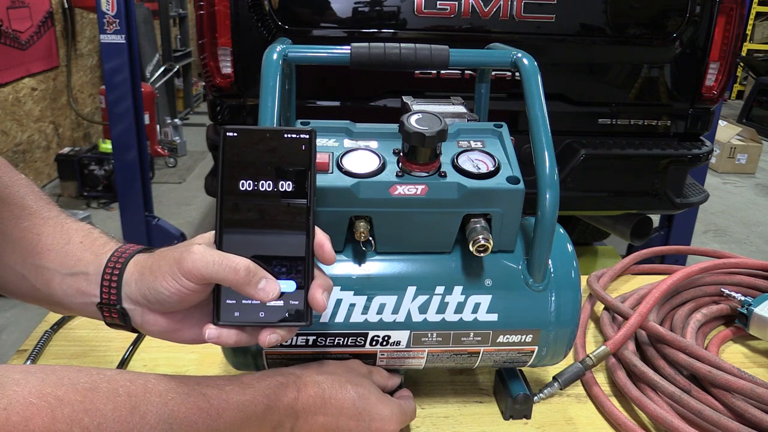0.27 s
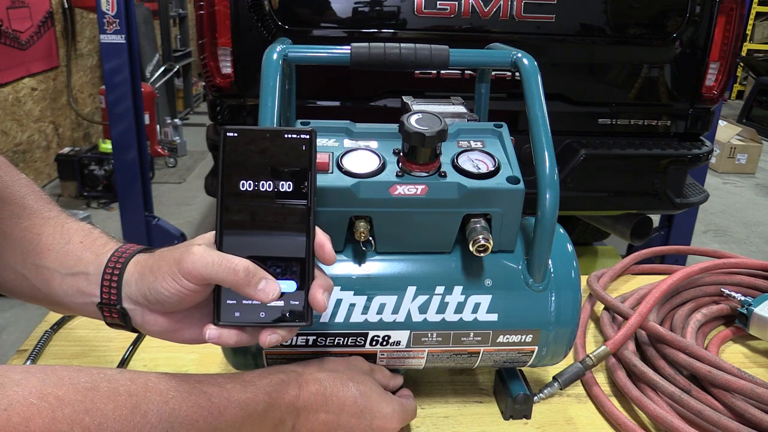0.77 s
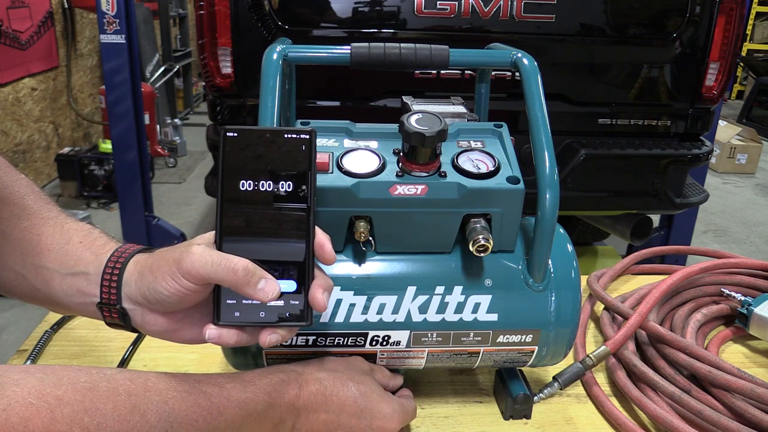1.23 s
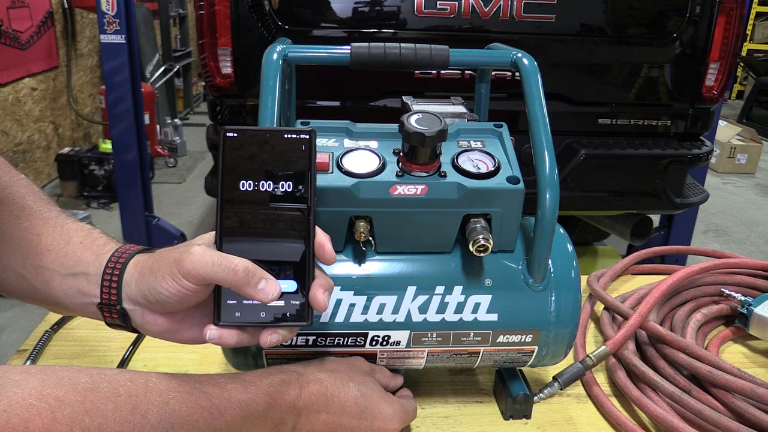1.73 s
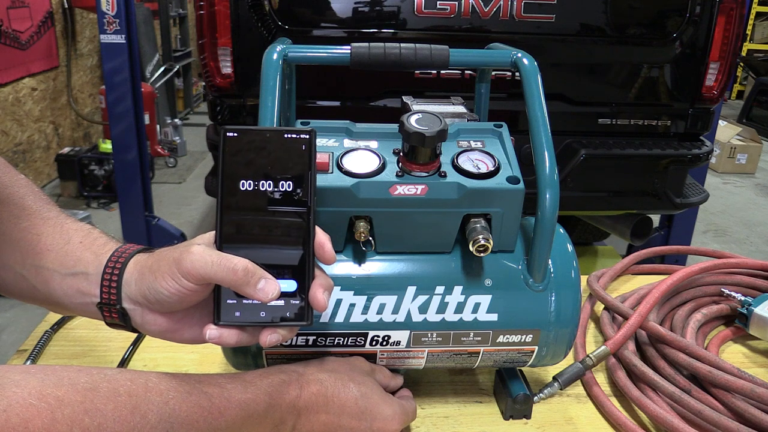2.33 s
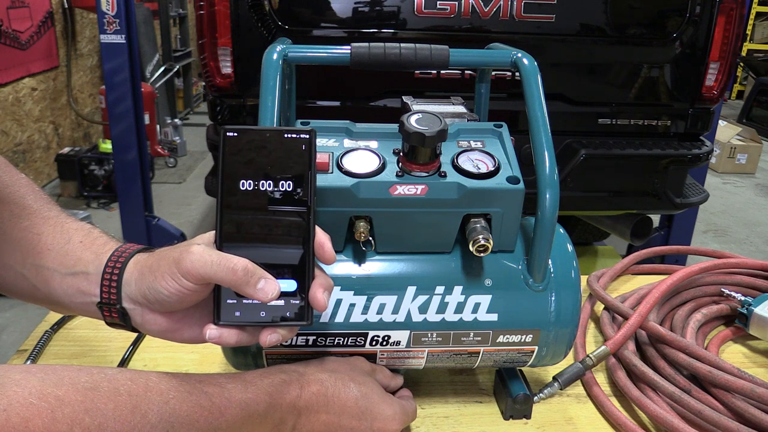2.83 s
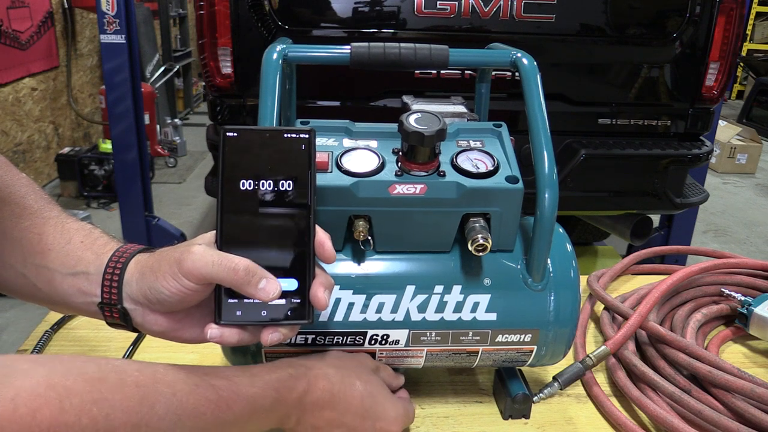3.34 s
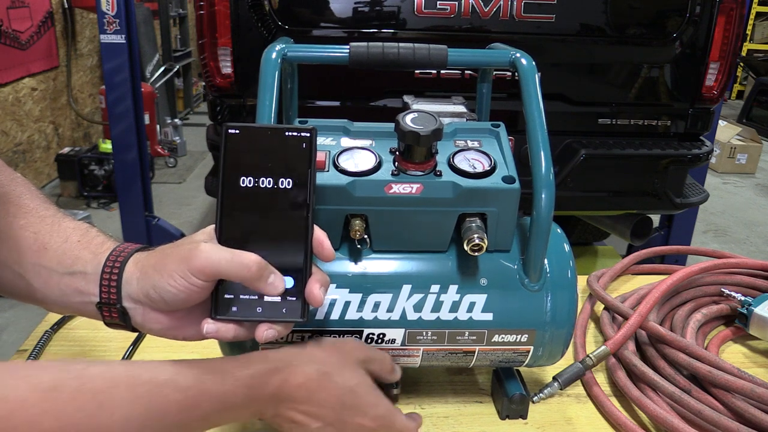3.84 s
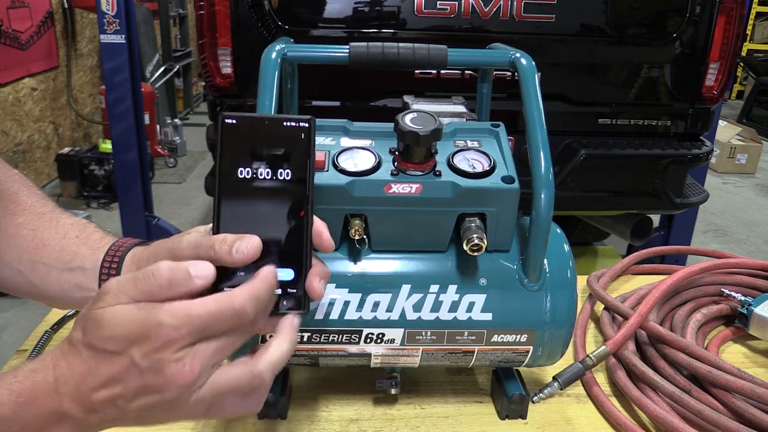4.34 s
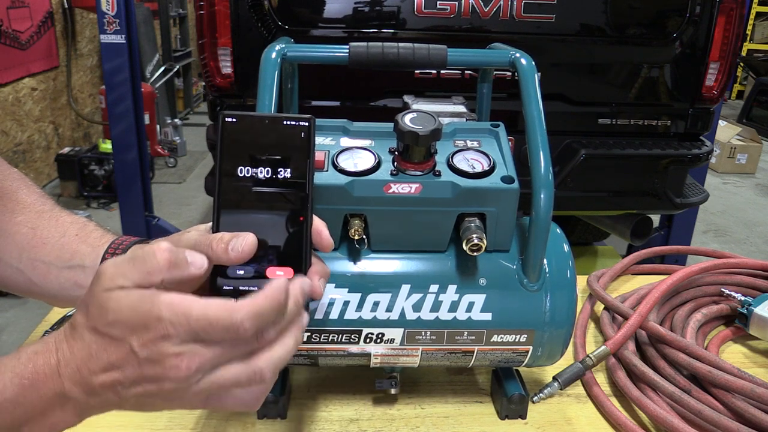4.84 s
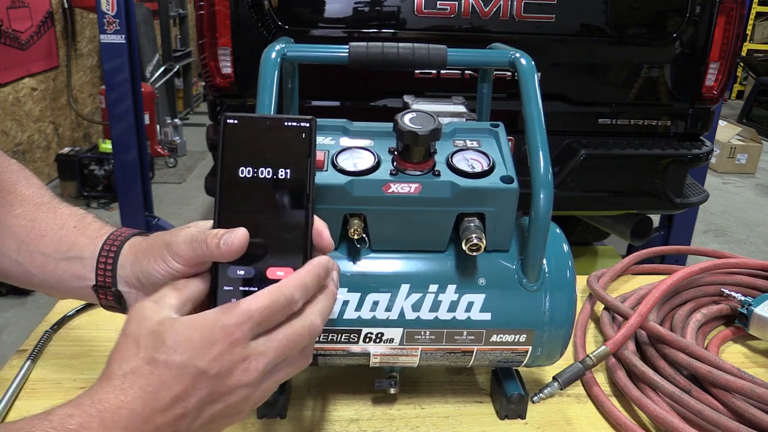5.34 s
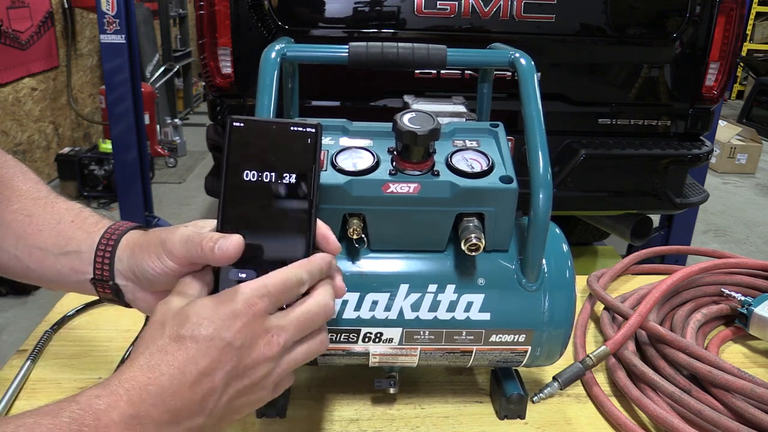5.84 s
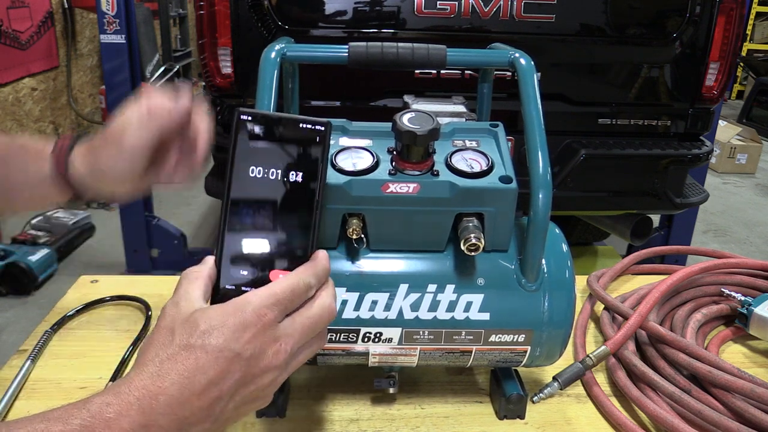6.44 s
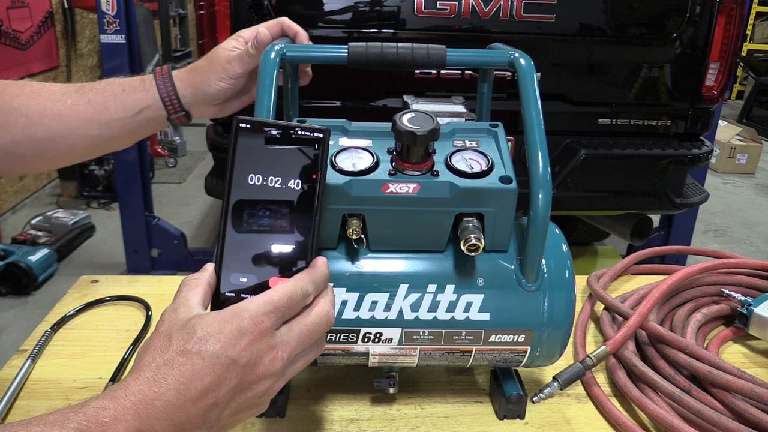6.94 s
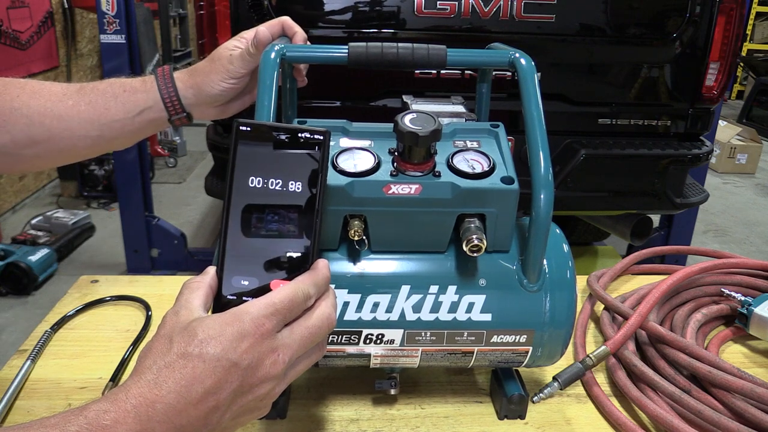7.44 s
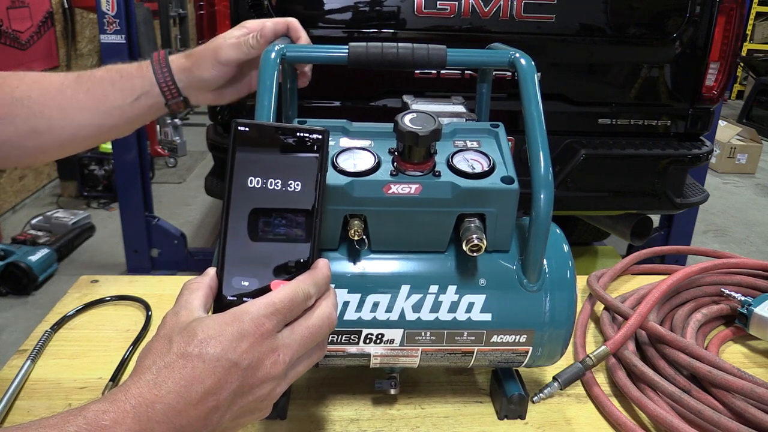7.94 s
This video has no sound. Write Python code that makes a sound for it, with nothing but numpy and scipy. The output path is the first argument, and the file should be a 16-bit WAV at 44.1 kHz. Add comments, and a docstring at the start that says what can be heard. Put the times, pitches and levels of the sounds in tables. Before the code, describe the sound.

Close to the microphone in a garage, a loud, high jet of air hisses from a compressor tank's drain valve while fingers click a few times on its handle. After about three seconds the pump starts with several dull knocks and the hiss snaps off. The small compressor then chugs on steadily, with a fast thumping throb, a motor whine, clacking valves and faint high chirps.

```python
"""Draining a compressor in a garage

Close to one microphone, a jet of air hisses from a small tank's drain valve while fingers click on the
handle. The pressure falls, the piston pump knocks on its mounts and starts, and the valve is shut.
The pump chugs on, housing thumping and reed valves chirping, and slows as the tank fills.
Late on, a hand takes hold of the carrying frame and changes how the housing shakes."""
import sys
import numpy as np
from scipy import signal
from scipy.fft import rfft, irfft
from scipy.io import wavfile
from scipy.ndimage import uniform_filter1d, map_coordinates

SR = 44100
rng = np.random.default_rng(int(sys.argv[2]) if len(sys.argv) > 2 else 0)


def generate_wav(sig):
    """Save sig (samples, or channels by samples) to the path in sys.argv[1] as 16-bit PCM at SR."""
    pcm = np.round(np.clip(np.atleast_2d(sig).T, -1, 1) * 32767).astype(np.int16)
    wavfile.write(sys.argv[1], SR, pcm)


N = 361619
T, HZ = np.arange(N) / SR, np.fft.rfftfreq(N, 1 / SR)


def gain_of(db):
    """Decibels to amplitude."""
    return 10 ** (np.asarray(db) / 20)

def unit_rms(x):
    """Scales to rms 1."""
    return x / np.sqrt(np.mean(x ** 2) + 1e-20)

def curve(rows):
    """A control curve at every sample."""
    return np.interp(T, *np.transpose(rows))

def read(points, hz=HZ):
    """A table joined by straight lines over log frequency."""
    f, value = np.transpose(points)
    return np.interp(np.log(hz + 1), np.log(f + 1), value)

def bump(hz, centre, width):
    """A bell-shaped resonance, half power at half the width."""
    return np.exp(-2 * np.log(2) * ((hz - centre) / width) ** 2)

def resonance_power(hz, modes):
    """The summed power of a body's resonances."""
    return sum((gain_of(db) * bump(hz, centre, width)) ** 2 for centre, width, db in modes)

def noise(gain, size=N):
    """Noise of rms 1 with the given spectrum."""
    return unit_rms(irfft(rfft(rng.standard_normal(size)) * gain, size))

def drift(rate):
    """A smooth random wander of rms 1."""
    coarse = T[::128]
    slow = map_coordinates(rng.standard_normal(2048), [coarse * rate], order=3, mode="wrap")
    return np.interp(T, coarse, unit_rms(slow))

def near_echoes(depth_db, spread_s):
    """Echoes from the bench and tank comb a spectrum with fine ripples."""
    delays, signs = rng.uniform(.1, 1, 14) * spread_s, rng.choice([-1, 1], 14)
    return gain_of(depth_db * unit_rms(signs @ np.cos(2 * np.pi * delays[:, None] * HZ)))

def damped_ring(hz, width, t60, size=8192):
    """A narrow band of noise dying away; low rings take longer to swell."""
    t, f = T[:size], np.fft.rfftfreq(size, 1 / SR)
    fade = gain_of(-60 * t / t60) * np.minimum(t * hz, 1)
    return unit_rms(noise(bump(f, hz, width), size) * fade) * np.sqrt(np.mean(fade ** 2))

def blow_phases(hz, ring_s, direct):
    """Phases of a body struck once a turn: the blow itself, then its scattered ring."""
    t = np.arange(1300) / SR
    ring = rng.standard_normal(len(t)) * np.exp(-t / ring_s)
    return np.angle(direct + np.exp(-2j * np.pi * np.outer(hz, t)) @ ring / np.linalg.norm(ring))

def each_turn(turns, at, length):
    """A smooth gate that opens once in every turn of the crank."""
    return np.exp(-.5 * (((turns - at + .5) % 1 - .5) / length) ** 2)

def whistle(hz, width):
    """A rough whistle of rms 1 whose pitch flutters over the given width."""
    flutter = unit_rms(uniform_filter1d(rng.standard_normal(N), int(SR / width) + 1))
    return np.sqrt(2) * np.cos(2 * np.pi * np.cumsum(hz + .5 * width * flutter) / SR)

def add(mix, s, sound):
    """Mixes a sound in at the given time."""
    mix[round(s * SR):][:len(sound)] += sound


# the garage's background (frequency [Hz], relative level [dB])
ROOM_TONE = [(12, -4.5), (33, 0), (48, -3), (62, -2.5), (85, -10), (200, -16.5), (800, -19.5), (3000, -27),
             (15000, -46)]

def room_tone(level_db=-52):
    """A low, steady rumble all around the microphone."""
    return gain_of(level_db) * noise(gain_of(read(ROOM_TONE)))


# the jet with the valve only cracked open (frequency [Hz], relative level [dB])
LEAK = [(100, -41), (900, -16), (1700, -10), (2900, -20), (4100, -7), (4700, -14), (6100, -12), (7700, -1),
        (9300, -2), (9900, -16), (11000, 0.5), (13000, -16), (15800, -16)]
# the full jet's broad rush (frequency [Hz], relative level [dB])
JET_RUSH = [(100, -46), (350, -27.5), (800, -20), (1350, -26), (2600, -21.5), (5900, -18), (7000, -10),
            (9000, -14), (11500, -8.5), (12900, -17), (15800, -22)]
# resonances of the valve bore (frequency [Hz], width [Hz], relative level [dB])
BORE_MODES = [(1960, 310, -19.5), (3490, 560, -10.5), (3946, 350, -8.5), (4660, 380, -9.5),
              (5210, 200, -12), (7370, 330, -4.5), (8030, 260, -3.5), (8230, 230, -1.5), (8530, 146, 0.5),
              (9180, 500, -6.5), (9810, 230, 0.5), (10430, 270, -1.5), (11010, 270, -2), (12200, 300, -17),
              (13620, 450, -0.5), (14560, 400, -6.5), (15000, 250, -9), (15600, 250, -11)]

def drain_hiss(open_s=0.089, shut_s=3.372, leak_db=-29.5, jet_db=-23.5, sag_db_per_s=.12):
    """Close by, a turbulent jet rings the valve bore: cracked open, then wide, then snapped shut."""
    power = gain_of(read(JET_RUSH)) ** 2 + resonance_power(HZ, BORE_MODES)
    surge_db = np.exp(-abs(T - open_s) / .2)
    throttle_db = -2.5 * np.exp(-abs(T - shut_s) / 0.045)
    flow_db = jet_db - sag_db_per_s * T + surge_db + throttle_db  # sags as the tank empties
    jet = noise(np.sqrt(power) * near_echoes(depth_db=0.97, spread_s=.022))
    jet *= gain_of(flow_db + 0.48 * drift(rate=60))
    leak = gain_of(leak_db) * noise(gain_of(read(LEAK)))
    opened, shut = np.clip((T - open_s) / 0.0027, 0, 1), np.clip((T - shut_s) / 0.0017, 0, 1)
    return (1 - opened) * leak + opened * (1 - shut) * jet


# the garage's ring (frequency [Hz], t60 [s])
GARAGE_DECAY = [(200, 0.35), (1500, 0.98), (5000, 0.97), (9000, 0.89), (12000, 0.33), (15000, 0.43)]

def garage_reverb(x):
    """The walls send a diffuse tail back to the microphone, each band dying at its own speed."""
    hz, t, bands = signal.stft(rng.standard_normal(SR) * (T[:SR] > .006), SR, nperseg=256)
    fade = gain_of(-60 * t / read(GARAGE_DECAY, hz)[:, None])
    tail = signal.istft(bands * fade, SR, nperseg=256)[1]
    return signal.fftconvolve(x, tail / np.linalg.norm(tail))[:N]


# fingers on the valve handle (time [s], ring level [dB], favoured pitch [Hz], crack level [dB])
TOUCHES = [(.196, -46, 520, -28), (1.543, -30, 1550, -19.5), (1.607, -28, 520, -19),
           (1.8, -23, 1620, -15.5), (1.811, -32, 2200, -18), (2.669, -44, 1500, -31),
           (2.858, -30.5, 925, -26), (2.859, -26, 3170, -22)]
# the crack of a touch (frequency [Hz], relative level [dB])
TOUCH_CRACK = [(200, -28), (700, -1.5), (2000, -7.5), (4500, 1.5), (6000, -6.5), (9000, 11.5), (11000, -7),
               (15000, -23)]
# the handle's modes (frequency [Hz], width [Hz], relative level [dB], t60 [s])
HANDLE_MODES = [(520, 430, -0.5, 0.031), (925, 480, -5, .032), (1670, 230, 0, 0.067),
                (3170, 280, 0.5, 0.082)]

def handle_clicks(crack_t60=0.046, favour_db_per_octave=11.5, size=8192):
    """Each touch cracks and rings the handle; modes away from its favoured pitch ring less."""
    out, f = np.zeros(N), np.fft.rfftfreq(size, 1 / SR)
    crack_fade = gain_of(-60 * T[:size] / crack_t60)
    for s, ring_db, favoured_hz, crack_db in TOUCHES:
        add(out, s, gain_of(crack_db) * noise(gain_of(read(TOUCH_CRACK, f)), size) * crack_fade)
        for hz, width, db, t60 in HANDLE_MODES:
            away_db = favour_db_per_octave * abs(np.log2(hz / favoured_hz))
            add(out, s, gain_of(ring_db + db - away_db) * damped_ring(hz, width, t60))
    return out


# jolts of the starting pump (time [s], level [dB], ring length [factor])
JOLTS = [(3.171, -23, 2), (3.199, -23, 1.1), (3.21, -21, 0.6), (3.267, -17, 0.72), (3.526, -17, 0.66)]
# the mounts' modes (frequency [Hz], width [Hz], relative level [dB], t60 [s])
MOUNT_MODES = [(300, 250, -5.5, 0.032), (750, 350, 0, 0.063)]

def mount_knocks():
    """The pump knocks dully on its mounts as it starts."""
    out = np.zeros(N)
    for s, knock_db, length in JOLTS:
        for hz, width, db, t60 in MOUNT_MODES:
            add(out, s, gain_of(knock_db + db) * damped_ring(hz, width, t60 * length))
    return out


START_S, START_CRANK_HZ = 3.207, 33.4315
TOP_ORDER = 30  # the housing shakes up to this multiple of the crank speed; the clack lies above
# the hand on the carrying frame (time [s], hold [0-1])
HAND_GRIP = [(6.9, 0), (7.3, 0.81)]
# the tank's push on the reed valves (time [s], back pressure [0-1])
BACK_PRESSURE = [(6.2, 0), (6.8, 1), (7.2, 1)]

def pump(sag_hz=.26254, sag_power=.6, load_s=0.65):
    """One crank drives every part; it starts at full speed and slows as the load grows."""
    age = np.maximum(T - START_S, 0)
    crank_hz = START_CRANK_HZ - sag_hz * age ** sag_power
    turns = np.cumsum(crank_hz) / SR - START_CRANK_HZ * START_S
    unloaded = np.exp(-age / load_s)  # fades as the cylinder head comes under load
    grip, pressure = curve(HAND_GRIP), curve(BACK_PRESSURE)
    running = np.clip((T - 3.195) / 0.023, 0, 1)
    body = housing_shake(turns, grip, unloaded) + valve_clack(turns, grip, unloaded)
    air = intake_churn(turns) + valve_rasp(turns, pressure, unloaded)
    return running * (body + air + reed_chirps(turns, pressure) + reed_squeaks())


# the crank's broad shaking of the housing (frequency [Hz], level per order [dB])
CRANK_SHAKE = [(33, -49), (66, -42.5), (150, -44), (198, -45), (235, -41), (330, -42.5), (530, -48),
               (690, -44.5), (1000, -53.5)]
# the housing's resonances (frequency [Hz], width [Hz], level [dB])
HOUSING_MODES = [(133, 35.4, -35), (413.4, 41, -36.5), (477, 43, -36), (568, 30, -37.5), (844, 102, -36)]
# resonances that the hand damps or frees (frequency [Hz], width [Hz], change [dB])
GRIP_CHANGES = [(66, 20, -18), (132, 96, 1), (358, 28, 6.5), (434, 22, 3.5), (456, 20, -5), (610, 73, -4),
                (810, 38, -3), (985, 51, 11)]

def housing_shake(turns, grip, unloaded, whine_order=28, blow_at=0.1086, thump=0.62, trim_db=0.2):
    """Each compression thumps the housing; middle orders waver more than the throb and the whine."""
    out, orders = np.zeros(N), np.arange(1, TOP_ORDER + 1)
    hz = orders * np.mean(np.diff(turns[T > START_S])) * SR
    power = gain_of(read(CRANK_SHAKE, hz)) ** 2 + resonance_power(hz, HOUSING_MODES)
    power[orders == whine_order] += gain_of(-30.3) ** 2  # the drive's whine
    power[orders == whine_order - 1] += gain_of(-36.5) ** 2  # and its weaker partner
    held = sum(db * bump(hz, centre, width) for centre, width, db in GRIP_CHANGES)
    direct = thump * np.clip(1 - orders / 24, 0, 1)  # high orders ring on through the whole turn
    phases = blow_phases(hz, ring_s=0.045, direct=direct)
    sing = 2.5 * bump(hz, centre=810, width=76)  # the motor sings while it takes up the load
    for k, size, held_db, sing_db, phase in zip(orders, np.sqrt(power), held, sing, phases):
        waver_db = np.interp(k, [3.2, 13.4, 17, 29], [0.56, 1.53, 1.5, 0.58]) * drift(rate=3.05)
        amplitude = size * gain_of(held_db * grip + sing_db * unloaded + waver_db)
        out += amplitude * np.cos(2 * np.pi * k * (turns - blow_at) + phase)
    return np.sqrt(2) * gain_of(trim_db) * out


# the ring of the closing valves (frequency [Hz], relative level [dB])
VALVE_RING = [(1000, 4.5), (1130, 3.5), (1300, -3.5), (1500, -6.5), (1700, -7), (1950, -9), (2150, -16.5),
              (3000, -20), (4000, -23.5)]

def valve_clack(turns, grip, unloaded, loaded_db=-35, slap_at=0.07035):
    """The valves slap shut once a turn; their ring builds after the start and softens under the hand."""
    out, orders = np.zeros(N), np.arange(TOP_ORDER + 1, 120)
    hz, cycle = orders * START_CRANK_HZ, np.linspace(0, 1, 2049)
    stages = np.linspace(START_S, T[-1], num=5)
    for s in stages:  # the colour drifts at random
        phases = blow_phases(hz, ring_s=0.013, direct=0.13)
        angle = 2 * np.pi * np.outer(orders, cycle - slap_at) + phases[:, None]
        spectrum = gain_of(read(VALVE_RING, hz) + 3.4 * rng.standard_normal(len(hz)))
        slap = unit_rms(spectrum @ np.cos(angle))
        crossfade = np.cos(np.pi / 2 * np.clip((T - s) / (stages[1] - stages[0]), -1, 1))
        out += crossfade * np.interp(turns % 1, cycle, slap)
    return gain_of(loaded_db - 5 * unloaded - 2.5 * grip + 0.65 * drift(rate=30)) * out


# air in the intake and cooling fan (frequency [Hz], relative level [dB])
INTAKE_AIR = [(12, -49), (50, -29), (130, -16.5), (210, -13.5), (310, -9), (400, 1.5), (520, -0.5),
              (680, 2), (850, -8.5), (1120, -5.5), (1500, -16), (1900, -14), (2200, -23), (3500, -33),
              (8000, -68)]

def intake_churn(turns, level_db=-29):
    """Churning air swells on each intake stroke."""
    swell_db = 1.8 * np.cos(2 * np.pi * (turns - .5))
    return gain_of(level_db) * unit_rms(noise(gain_of(read(INTAKE_AIR))) * gain_of(swell_db))


# air forced through the valves (frequency [Hz], relative level [dB])
VALVE_AIR = [(1300, -31), (2050, -10), (2500, -8), (3000, -1), (4100, -2), (4800, -4.5), (6000, -9.5),
             (6500, -8.5), (7600, -6), (8400, -9), (9000, -9), (10800, -10), (12000, -14), (15800, -17)]
# the exhaust and intake strokes (position [turns], half length [turns], swell [dB])
PISTON_STROKES = [(.1, 0.071, 3), (.58, 0.064, 2)]

def valve_rasp(turns, pressure, unloaded, loaded_db=-44):
    """Air rasps through the valves, swelling on both strokes of the piston."""
    stroke_db = sum(db * each_turn(turns, at, length) for at, length, db in PISTON_STROKES)
    rasp = noise(gain_of(read(VALVE_AIR)) * near_echoes(depth_db=2.0, spread_s=.007))
    rasp *= gain_of(stroke_db + .5 * drift(rate=66))
    return gain_of(loaded_db - 1.5 * unloaded + 0.6 * pressure) * unit_rms(rasp)


# the reed valves' notes (position [turns], half length [turns], pitch [Hz], width [Hz],
# level at low pressure [dB], level at high pressure [dB])
REED_NOTES = [(.03, .04, 6330, 200, -66, -56.5), (.1, 0.03, 2913, 200, -57.5, -60),
              (.02, .06, 10450, 150, -69, -59.5), (.3, 0.38, 4110, 120, -60, -57.5),
              (.3, .09, 6700, 120, -70, -59), (.35, 0.075, 9730, 60, -56.5, -59),
              (.7, 0.11, 8900, 90, -61.5, -64), (.81, .02, 9900, 600, -66, -61.5),
              (.99, .02, 13000, 2500, -65, -62), (.22, .12, 14500, 1200, -67, -66)]

def reed_chirps(turns, pressure):
    """The reeds chirp on every turn; back pressure shifts the balance of their notes."""
    out = np.zeros(N)
    for at, length, hz, width, low_db, high_db in REED_NOTES:
        level_db = low_db + (high_db - low_db) * pressure + 1.4 * drift(rate=31)
        out += gain_of(level_db) * unit_rms(each_turn(turns, at, length) * whistle(hz, width))
    return out


# stray squeaks of the reeds (middle time [s], half length [s], level [dB])
STRAY_SQUEAKS = [(3.8, .04, -55), (5.38, .11, -55)]

def reed_squeaks():
    """Twice a reed squeaks faintly on one high pitch."""
    swell = sum(gain_of(db) * np.exp(-.5 * ((T - s) / length) ** 2) for s, length, db in STRAY_SQUEAKS)
    return swell * whistle(hz=7680, width=70)


def scene(hiss_room_db=-12, impact_room_db=-13):
    """The compressor close in front of one microphone, over the garage's low rumble."""
    hiss, impacts = drain_hiss(), handle_clicks() + mount_knocks()
    room = garage_reverb(gain_of(hiss_room_db) * hiss + gain_of(impact_room_db) * impacts)
    mono = hiss + impacts + room + pump() + room_tone()
    return np.array([mono, mono])

def record(dry):
    """The microphone's signal, cut off steeply at the top of the treble."""
    lowpass = signal.firwin(801, cutoff=15780, window=("kaiser", 9), fs=SR)
    return signal.oaconvolve(dry, lowpass[None], "same")


dry = scene()
out = record(dry)
generate_wav(out)
```